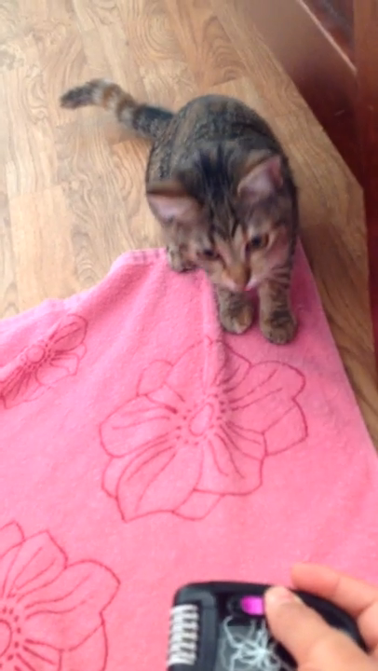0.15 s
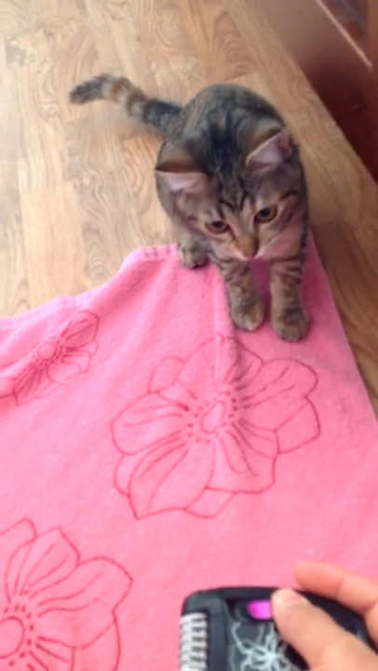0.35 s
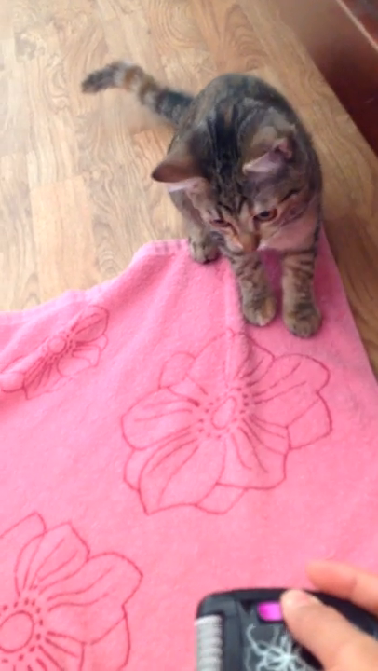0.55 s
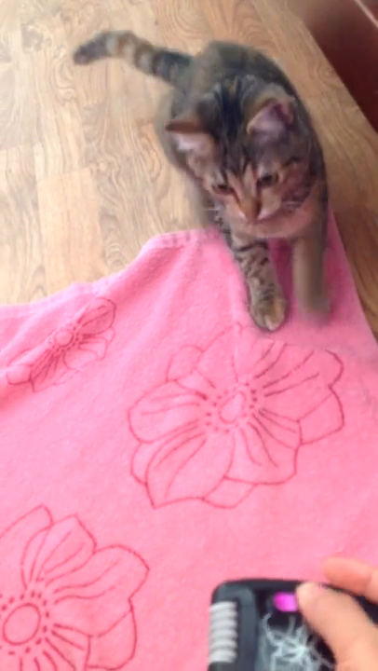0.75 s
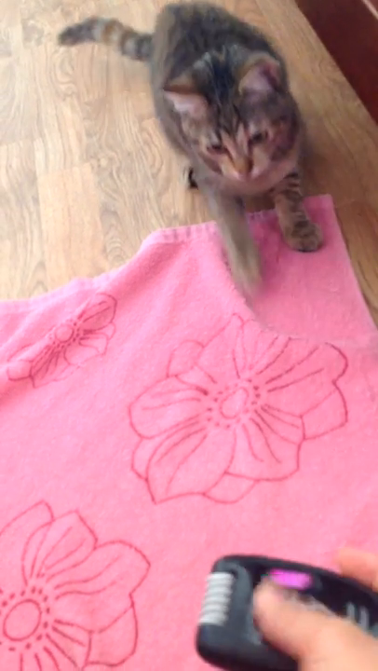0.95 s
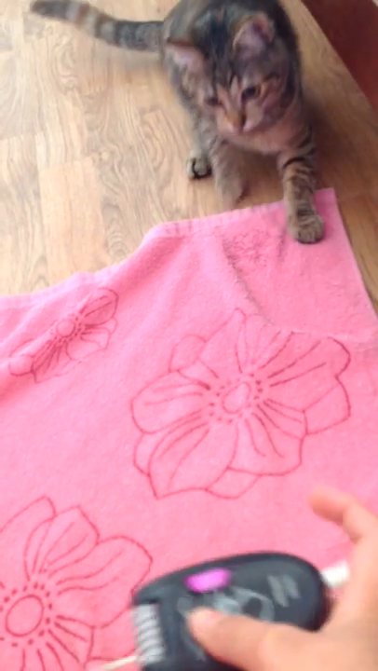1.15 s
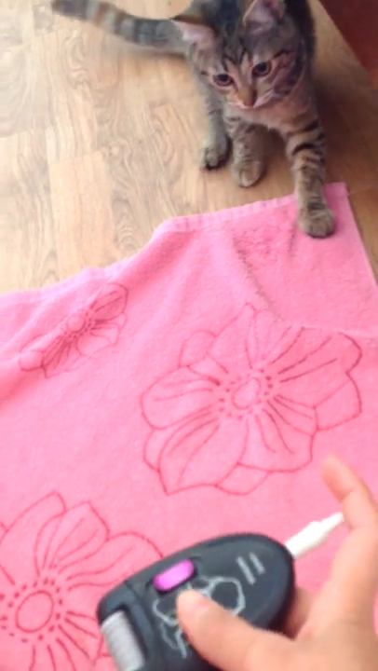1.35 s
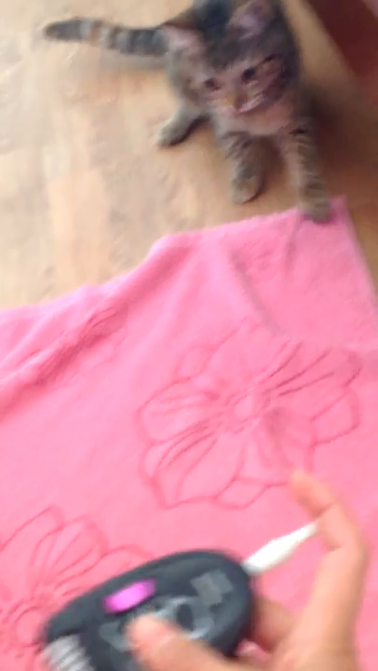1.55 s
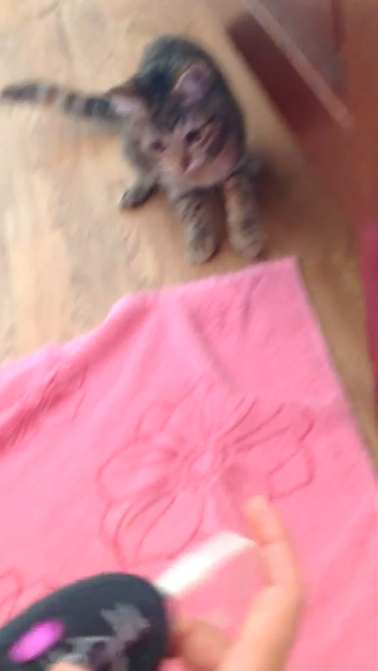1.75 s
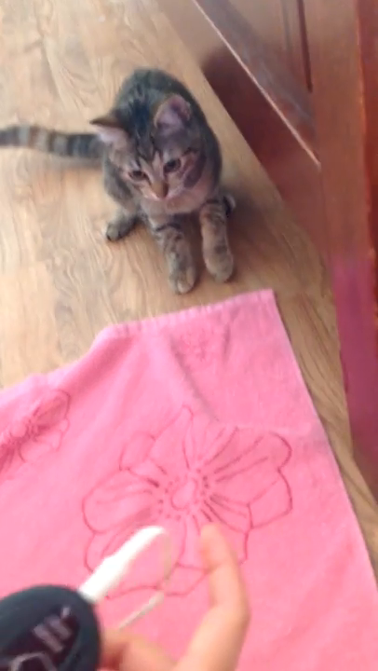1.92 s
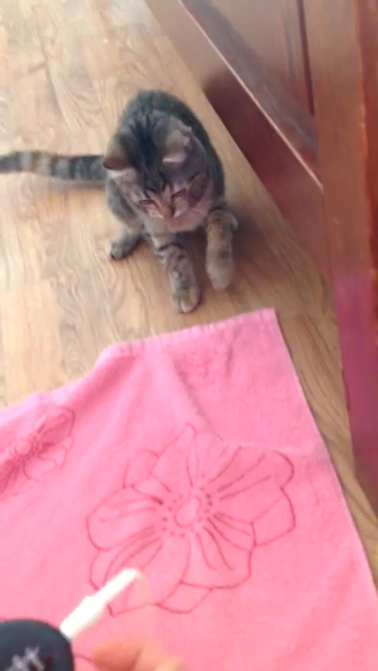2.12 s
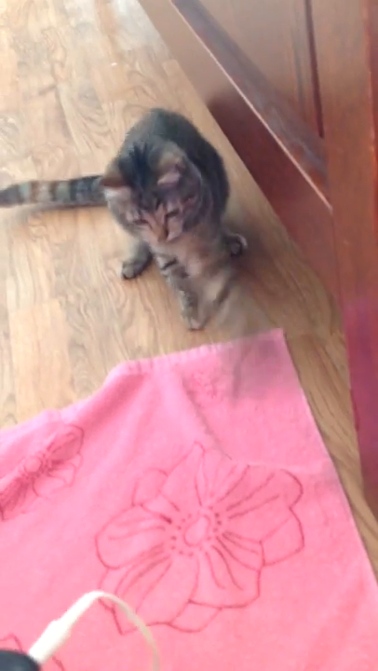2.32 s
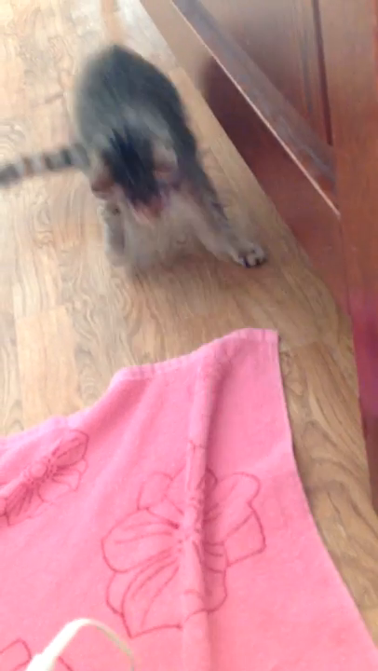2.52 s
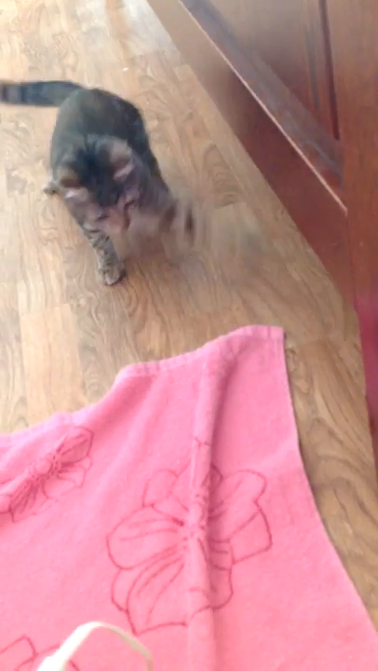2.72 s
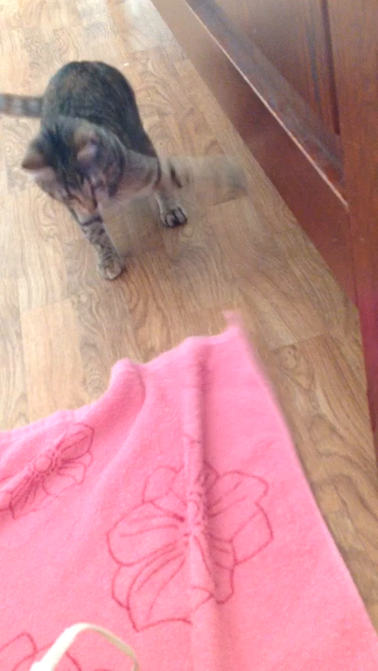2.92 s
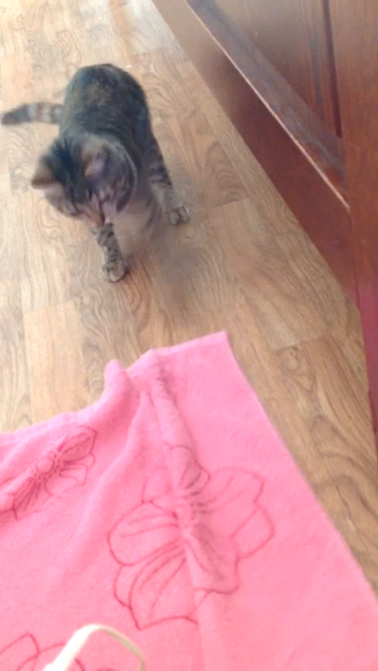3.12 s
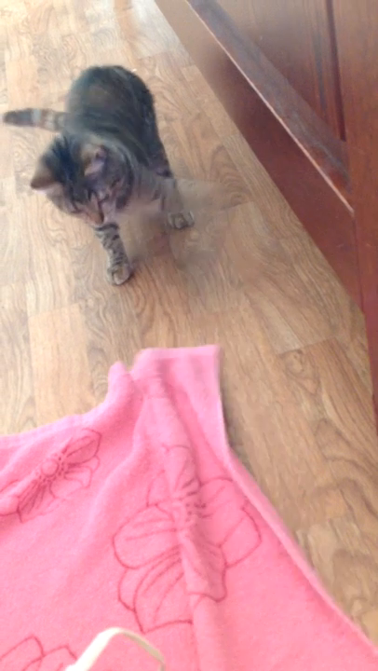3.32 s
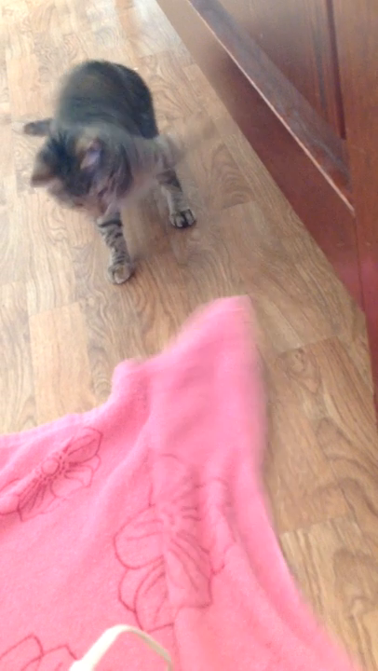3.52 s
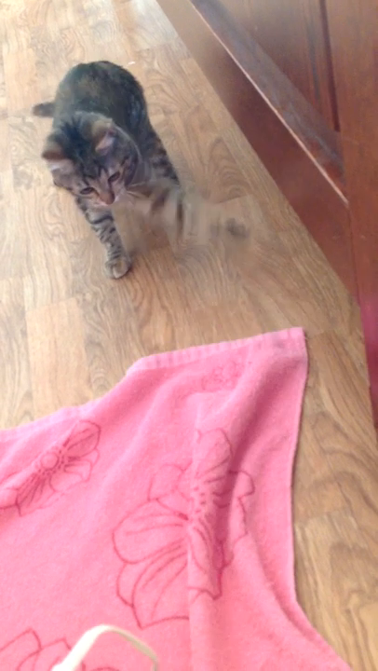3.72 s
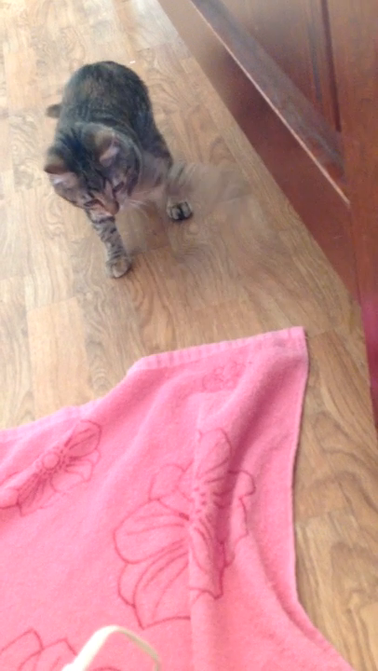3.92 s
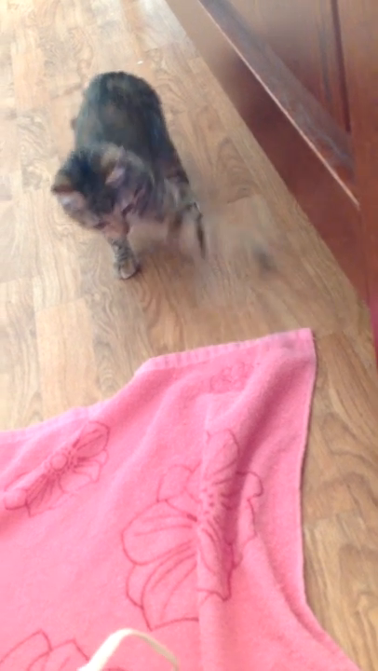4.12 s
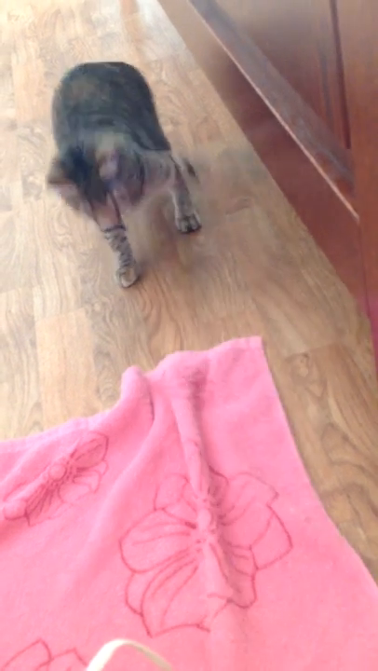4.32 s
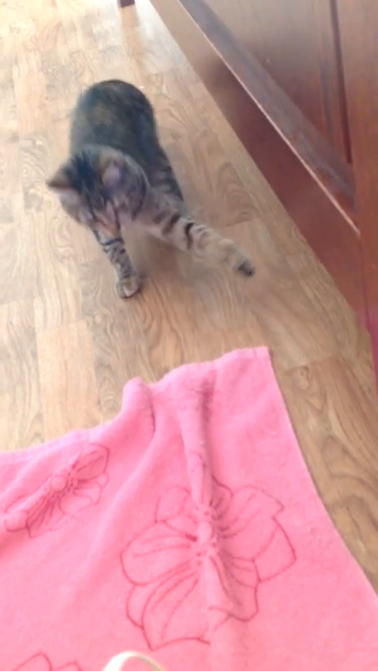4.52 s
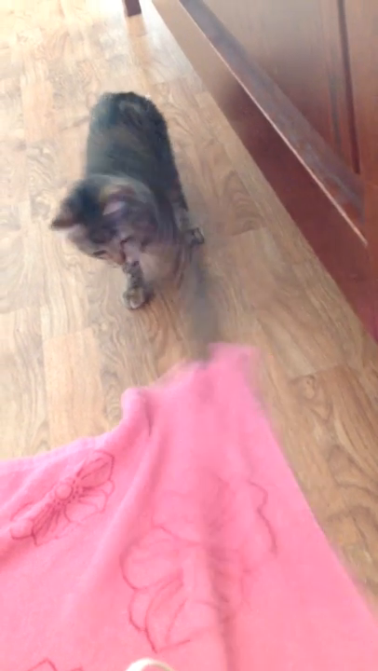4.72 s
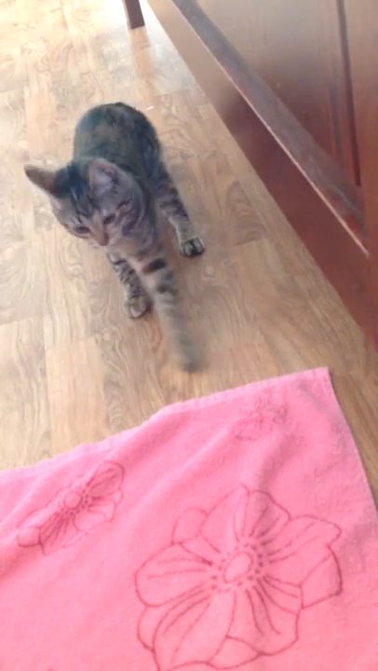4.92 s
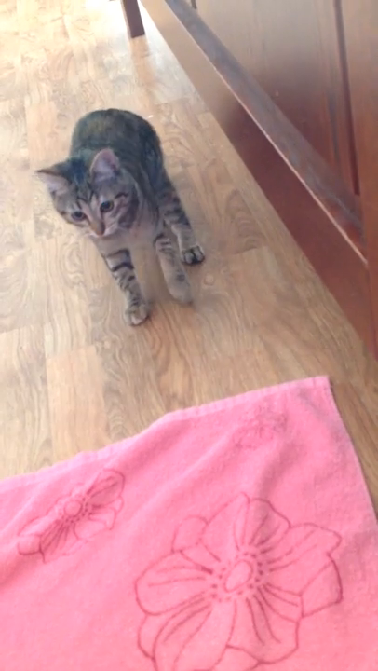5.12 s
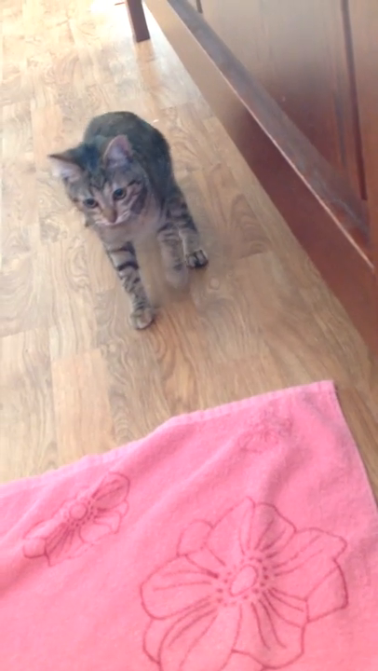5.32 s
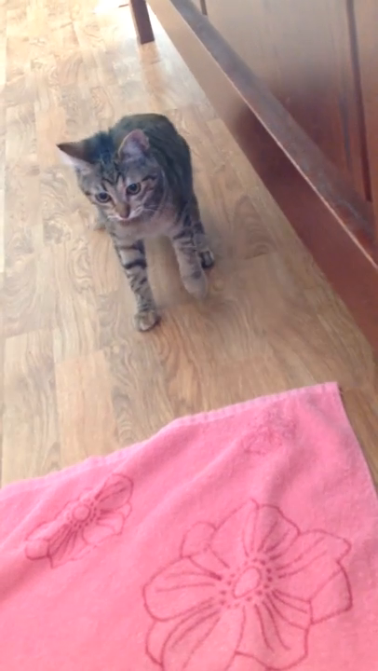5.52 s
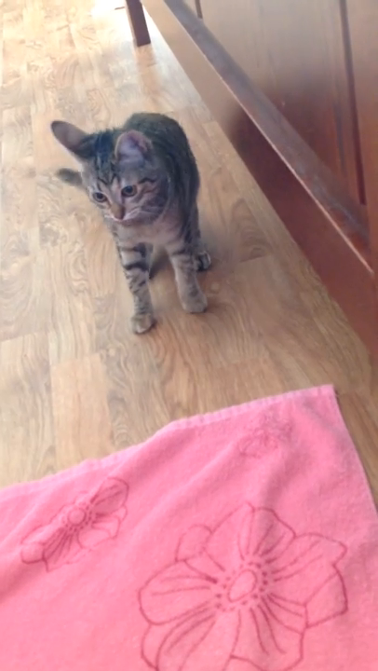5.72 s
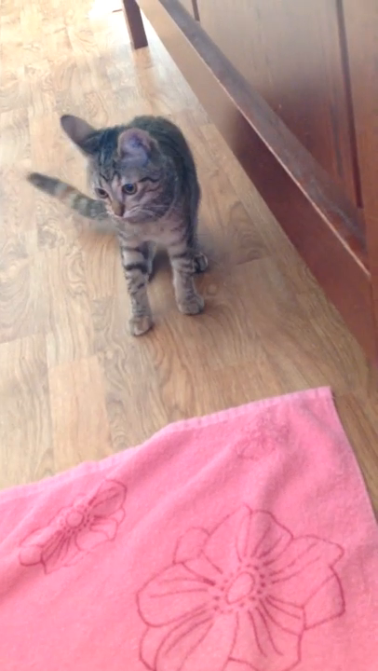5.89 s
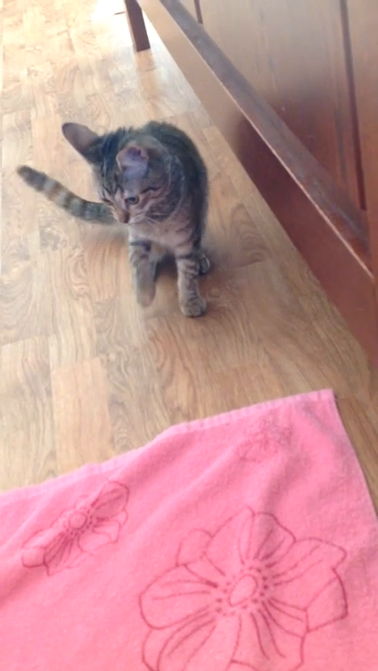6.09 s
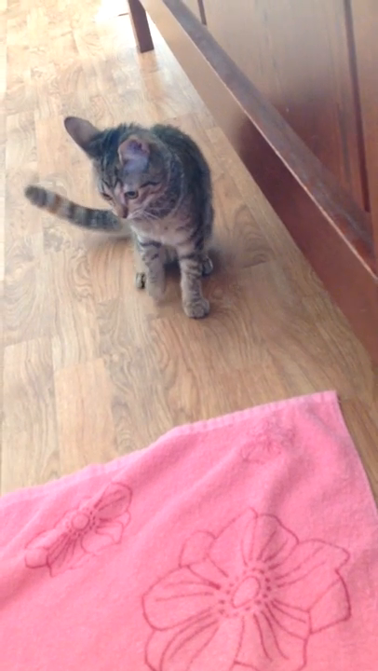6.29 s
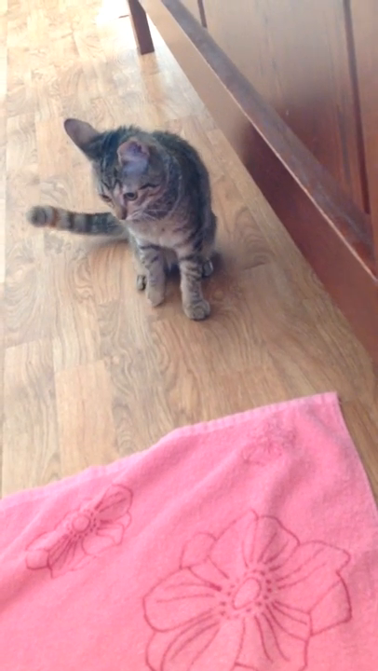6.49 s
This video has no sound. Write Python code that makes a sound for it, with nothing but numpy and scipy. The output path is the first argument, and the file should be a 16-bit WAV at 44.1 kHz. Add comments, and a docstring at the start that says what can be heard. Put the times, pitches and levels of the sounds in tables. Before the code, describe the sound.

Close recording in a small, quiet indoor room. Faint handling ticks come first, then a small motor device switches on and jumps straight to full speed. It buzzes continuously, bright and rough, with rapid metallic chatter and a gritty gear whirr. Its colour changes subtly when turned, lowered and pointed away. Soft low knocks from a kitten pawing at cloth sit underneath, and the buzz never stops.

```python
"""Hand-held epilator in a quiet room

Close to the microphone a small electric epilator is switched on and runs on, held in a hand.
Its drum spins up to about 29 turns a second; four rows of tweezers snap shut and chatter in each turn.
Filtered noise makes the gears grind, tones locked to the drum make them hum, and a rubbing drum whines.
The shell's resonances shift as the hand turns, lowers and averts it; a short room answer follows.
Behind it are ticks of handling, soft bumps as a kitten paws at a towel, and the room's quiet noise."""
import sys
import numpy as np
from scipy import signal
from scipy.fft import rfft, irfft, next_fast_len
from scipy.io import wavfile
from scipy.ndimage import map_coordinates

SR = 44100
rng = np.random.default_rng(int(sys.argv[2]) if len(sys.argv) > 2 else 0)


def to_wav(sig):
    """Store sig (one row per channel, or 1-D mono) as 16-bit WAV at the path in sys.argv[1].

    Samples outside -1..1 are clipped; the rate is SR.
    """
    pcm = np.clip(np.atleast_2d(sig), -1, 1) * 32767
    pcm = np.round(pcm).astype(np.int16)
    wavfile.write(sys.argv[1], SR, pcm.T)  # frames by channels


N = 288855
T = np.arange(N) / SR  # time of every sample [s]

SWITCH_ON_S, SPIN_UP_S = 0.61, 0.029  # start, and time constant of the drum's approach to speed
# drum speed once it is up: (time [s], speed [turns/s])
DRUM_SPEED = [(0.6, 29.88), (0.95, 29.39), (1.2, 29.12), (1.55, 29.65), (1.9, 29.31), (2.3, 29.29),
              (2.85, 29.4), (2.98, 28.21), (3.35, 28.62), (3.7, 28.92), (4.05, 28.92), (4.2, 29.27),
              (4.42, 28.52), (4.72, 29.2), (5.0, 28.63), (5.3, 29.09), (6.1, 29.13), (6.4, 28.63)]
# tweezer rows round the drum: (place in the turn [0-1], relative strength [dB])
TWEEZER_ROWS = [(0.098, -6), (0.337, -6), (0.588, -7), (0.81, -4)]
# spells in which a row knocks harder or softer, one list per row: (middle [s], half length [s], lift [dB])
ROW_SPELLS = [
    [(1.15, 0.13, 2.5), (2.02, 0.14, 4.5), (3.1, 0.089, 0.5), (3.65, 0.28, -1), (4.5, 0.53, 3),
     (5.65, 0.097, 3), (6.3, 0.13, -12)],
    [(0.7, 0.093, 7), (1.45, 0.2, -5.5), (2.15, 0.29, 4), (3.1, 0.08, -2), (3.8, 0.14, 4), (4.7, 0.3, 3)],
    [(0.87, 0.12, -9), (1.55, 0.31, 3), (3.38, 0.076, 4), (4.1, 0.5, 2), (5.0, 0.12, 4.5), (5.5, 0.34, 2.5),
     (6.02, 0.1, 0.5)],
    [(0.72, 0.087, 0.5), (1.18, 0.12, 0.5), (3.0, 0.12, 3), (3.55, 0.3, 2.5), (4.15, 0.19, -1),
     (4.5, 0.12, 0), (5.35, 0.11, 0), (5.85, 0.12, -1.5), (6.3, 0.28, 2)],
]
# single closings given their own force: (time [s], lift [dB])
CRACKING_CLOSINGS = [(0.626, 4), (0.641, -0.5), (1.176, -5), (2.674, 6), (3.475, 2.5), (4.565, 2),
                     (4.988, 2.5), (5.342, 2)]
# relative loudness of the works as the hand moves: (time [s], snapping [dB], grinding [dB])
WORKS_LOUDNESS = [(0.8, -34, -29.5), (1.2, -29, -30.5), (1.6, -31.5, -28), (2.4, -30.5, -29.5),
                  (3.1, -31.5, -27.5), (3.6, -29.5, -30.5), (4.3, -31, -29), (5.4, -29.5, -29.5),
                  (5.92, -30, -29.5), (6.2, -32.5, -28), (6.5, -33, -27.5)]
# colour of the snapping: (frequency [Hz], relative level [dB per Hz])
SNAP_COLOUR = [(30, -69), (100, -40), (250, -26), (420, -20), (600, -10.5), (800, -4), (1200, -1),
               (1700, -3.5), (2600, 0), (3600, -8), (5000, -10), (9000, -16.5), (15000, -21.5)]
# colour of the grinding: (frequency [Hz], relative level [dB per Hz])
GRIND_COLOUR = [(30, -60), (100, -40.5), (300, -23), (450, -13.5), (700, -3.5), (1200, -5), (2500, 1),
                (3600, -0.5), (5000, -1), (7000, -4), (10000, -8), (13000, -12.5), (15500, -19)]
# louder grinding just before the hand sinks: (middle [s], half length [s], lift [dB])
GRIND_STRAIN = (2.88, 0.084, 2)

# hum of drum and gear train, the two broken multiples from a faster shaft; levels before HUM_DB:
# (multiple of drum speed [1], level held up [dB], level once lowered [dB])
GEAR_LINES = [(12, -63.0, -59.5), (16, -56.5, -54.0), (17.31, -50.0, -51.5), (18, -57.0, -62.5),
              (20, -55.5, -62.5), (21.31, -47.0, -48.0), (22, -54.0, -55.0), (23, -59.5, -54.0),
              (24, -46.0, -46.5), (25, -54.0, -48.0), (26, -54.5, -49.5), (27, -53.0, -49.5),
              (28, -47.5, -45.5), (29, -54.0, -48.5), (30, -49.0, -48.0), (31, -48.5, -50.0),
              (32, -45.5, -46.5), (33, -49.5, -51.0), (34, -45.5, -42.5), (35, -48.0, -43.5),
              (36, -46.5, -45.0), (37, -46.0, -42.5), (38, -47.0, -41.5), (39, -48.5, -46.5),
              (40, -43.5, -41.0), (41, -46.0, -42.0), (42, -51.0, -48.5), (43, -50.0, -44.0),
              (44, -49.5, -45.5), (45, -51.5, -46.5), (46, -50.0, -47.5), (48, -50.0, -47.5),
              (50, -48.5, -45.0), (54, -50.5, -50.5), (65, -48.0, -52.0), (69, -47.0, -49.5),
              (71, -49.0, -50.5)]
# hum lines that swell once, keyed by multiple: (middle [s], half length [s], lift [dB])
LINE_SWELLS = {12: (3.52, 0.28, 6), 28: (1.22, 0.24, 10)}
HUM_WAVER_DB, HUM_SLACK = 3.0, 0.011  # wander of level; wander of phase [radians per multiple]
HUM_LAG, HUM_SKEW = 0.012, 0.8  # delay behind the closings [turns]; phase scatter [radians]
HUM_DB, HUM_FLUTTER_DB = -1.53, 1.12  # shift of the line levels; fast flutter of the whole hum
HUM_FOLLOWS = 0.55  # share of the snapping's level swings, in dB, that the hum follows
# brief whines of the drum rubbing in its head: (middle [s], half length [s], pitch [Hz], level [dB])
DRUM_WHINES = [(1.36, 0.13, 4170, -41), (2.68, 0.06, 4590, -35.5), (2.92, 0.11, 4530, -36),
               (3.65, 0.055, 4590, -33.5)]

# main resonance of the shell, sliding with the grip: (time [s], frequency [Hz])
SHELL_WHIRR = [(0.65, 2490), (1.7, 2555), (2.0, 2600), (2.4, 2804), (3.1, 2750), (3.6, 2740), (5.2, 2730),
               (5.9, 2727), (6.25, 2756), (6.55, 2726)]
WHIRR_WIDTH_HZ, WHIRR_DB = 170, 9
# the shell's other resonances, held level: (frequency [Hz], width [Hz], lift [dB])
LEVEL_MODES = [(950, 200, 9), (1980, 260, 8.5), (3290, 190, 9.5), (4460, 420, 7), (6500, 270, 4)]
# held tilted: (frequency [Hz], width [Hz], lift [dB])
TILTED_MODES = [(920, 140, 5.7), (2040, 200, 4.9), (4400, 290, 4.2), (7960, 1300, 5.1)]
# held turned: (frequency [Hz], width [Hz], lift [dB])
TURNED_MODES = [(656.4, 200, 2.5), (1180, 450, 6), (2464, 150, 6), (3400, 360, -4), (4520, 950, 6.5),
                (5400, 760, 2), (7750, 550, 3.5)]
# held low: (frequency [Hz], width [Hz], lift [dB])
LOW_MODES = [(1200, 680, 3.3), (2270, 60, 2), (2315, 85, -2), (2456, 130, 4.5), (2660, 90, 1),
             (3040, 59, 2.5), (3126, 120, 4.5), (3650, 200, -5), (3850, 35, 4), (4330, 920, 6),
             (4860, 560, 2), (6140, 380, 4.5), (7870, 360, 6)]
# pointed away: (frequency [Hz], width [Hz], lift [dB])
AWAY_MODES = [(1100, 360, 0), (2000, 500, 3.5), (2480, 120, 3.5), (2680, 110, -3.5), (2930, 250, 2.5),
              (3700, 210, -3), (4460, 1200, 5), (7840, 480, 5)]
# movements of the hand: (start [s], end [s])
TILTING, TURNING = [0.61, 1.3], [2.2, 2.58]
# the hand lowers the epilator: (start [s], end [s])
LOWERING_SPAN = [2.96, 3.7]
# the hand points it away: (start [s], end [s])
AVERTING_SPAN = [5.99, 6.2]

# faint ticks of handling, the last one the switch: (time [s], level before the noise [dB])
HANDLING_TICKS = [(0.092, -63), (0.219, -57), (0.335, -58), (0.609, -47)]
# soft bumps: (time [s], nominal peak level [dB], pitch [Hz], decay [s])
SOFT_BUMPS = [(1.9412, -28, 268, 0.0026), (2.41, -52, 230, 0.0074), (2.925, -50, 208, 0.006),
              (3.55, -53, 200, 0.0041), (3.854, -53, 267, 0.012), (4.27, -51, 240, 0.0055),
              (4.644, -34.5, 280, 0.0054), (4.802, -46, 253, 0.0068)]
# colour of the room's quiet: (frequency [Hz], relative level [dB per Hz])
ROOM_COLOUR = [(15, -56), (25, -26), (49, -25), (113, -9), (215, -1), (281, 0.5), (305, -2.5), (552, -6),
               (631, -9), (1530, -14), (2420, -14.5), (15500, -20.5)]
ROOM_DB = -62.5  # rms level of the quiet
TOP_HZ = 15450  # band limit of the recorder


def epilator():
    """The motor pulls the drum up to speed exponentially; its turning drives the snaps and the hum."""
    running = 1 - np.exp(-np.maximum(T - SWITCH_ON_S, 0) / SPIN_UP_S)
    lowered = np.interp(T, LOWERING_SPAN, [0, 1])
    turns = np.cumsum(running * curves(DRUM_SPEED)[0]) / SR
    snap_db, grind_db = curves(WORKS_LOUDNESS)

    snapping, shaking = tweezers(turns, scatter_db=1.52, jitter=0.0001, spread=0.0006,
                                 chatter_life=0.004, chatter_db=2.0, clack_db=-0.5, count=4)
    strain = amp(swell(T, *GRIND_STRAIN))
    rubbing = running ** 1.5 * strain * grinding(shaking, load_share=0.026, grain_db=1.0)
    works = amp(snap_db) * running ** 0.14 * snapping + amp(grind_db) * rubbing

    follow_db = HUM_FOLLOWS * (snap_db - np.median(snap_db))
    hum_db = HUM_DB + follow_db + HUM_FLUTTER_DB * wobble(60)
    hum = running ** 14 * amp(hum_db) * gear_hum(turns, lowered)
    heard_works = room(shell(works, lowered), t60=0.2, wet_db=-11, count=10)
    return heard_works + hum + whines(width_hz=30)


def tweezers(turns, scatter_db, jitter, spread, chatter_life, chatter_db, clack_db, count):
    """Rows of count blades snap, chatter and clack; returns the sound and the chatter envelope."""
    place, row_db = np.transpose(TWEEZER_ROWS)
    total = int(turns[-1])
    closing = (np.arange(total)[:, None] + place).ravel()
    times = np.interp(closing, turns, T)
    chance = rng.standard_normal((len(closing), 4))

    row_times = times.reshape(total, -1).T
    spell_db = np.transpose([sum(swell(t, *spell) for spell in spells)
                             for t, spells in zip(row_times, ROW_SPELLS)])
    force_db = (row_db + spell_db).ravel()
    for s, db in CRACKING_CLOSINGS:
        nearest = np.argmin(np.abs(times - s))
        force_db[nearest] += db
        chance[nearest, :3] = 0  # no random force or clack delay here
    sizes = amp(force_db + scatter_db * np.clip(chance[:, 0], -2, 2))

    # every blade seats with its own lag [s], a little different in each turn
    lags = np.tile(spread * rng.standard_normal((len(TWEEZER_ROWS), count)), (total, 1))
    seating = times[:, None] + lags + jitter * rng.standard_normal(lags.shape)
    signs = (-1) ** np.arange(count)
    snaps = unit(impulses(seating.ravel(), (sizes[:, None] * signs).ravel()))

    # the blades touch 1 ms before they seat and rattle on after it
    touches = impulses(times - 0.001, sizes ** 2)
    shaking = unit(np.sqrt(np.abs(fading(touches, chatter_life))))
    chatter_colour = along([(600, -9.5), (1200, -4.5), (2200, 0.0)])
    chatter = coloured(shaking * rng.standard_normal(N), chatter_colour)

    # play in the bearings lets the drum clack against the head, unevenly from closing to closing
    blow_db = force_db + 1.0 * np.clip(chance[:, 2], -2, 1.1)
    blows = amp(blow_db) * np.sign(chance[:, 3])
    clack_colour = along([(600, -22.5), (1600, -7.5), (2600, -1.0), (4000, -8.5)])
    clacks = coloured(unit(impulses(times + 0.0004 * chance[:, 1], blows)), clack_colour)

    mixed = snaps + amp(chatter_db) * chatter + amp(clack_db) * clacks
    return unit(coloured(mixed, along(SNAP_COLOUR))), shaking


def grinding(shaking, load_share, grain_db):
    """Teeth and cams rub as grainy noise, harder while a row is pressed shut."""
    load = 1 + load_share * shaking
    friction = load * amp(grain_db * wobble(900)) * rng.standard_normal(N)
    return unit(coloured(friction, along(GRIND_COLOUR)))


def gear_hum(turns, lowered):
    """Tones locked to the drum, loosely in step with the closings, waver with the play of the teeth."""
    place, row_db = np.transpose(TWEEZER_ROWS)
    hum = np.zeros(N)
    for multiple, up_db, low_db in GEAR_LINES:
        db = up_db + lowered * (low_db - up_db) + HUM_WAVER_DB * wobble(5)
        if multiple in LINE_SWELLS:
            db = db + swell(T, *LINE_SWELLS[multiple])
        row_phases = np.exp(-2j * np.pi * multiple * (place + HUM_LAG))
        in_step = np.angle(np.sum(amp(row_db) * row_phases)) + HUM_SKEW * rng.standard_normal()
        slack = HUM_SLACK * multiple * wobble(12)
        hum += amp(db) * np.cos(2 * np.pi * multiple * turns + in_step + slack)
    return np.sqrt(2) * hum  # line levels are rms


def whines(width_hz):
    """Rubbing noise sets a narrow resonance singing for a moment."""
    out = np.zeros(N)
    for s, half, hz, db in DRUM_WHINES:
        singing = unit(ring(rng.standard_normal(N), hz, width_hz))
        out += amp(db) * np.exp(-((T - s) / half) ** 2) * singing
    return out


def shell(x, lowered):
    """The plastic shell's resonances crossfade as the hand tilts, turns, lowers and averts it."""
    whirr = ring(x, curves(SHELL_WHIRR)[0], WHIRR_WIDTH_HZ)
    x = x + (amp(WHIRR_DB) - 1) * whirr
    heard = coloured(x, lifts(LEVEL_MODES))
    tilted, turned, averted = [np.interp(T, span, [0, 1]) for span in (TILTING, TURNING, AVERTING_SPAN)]
    for modes, share in [(TILTED_MODES, tilted), (TURNED_MODES, turned),
                         (LOW_MODES, lowered), (AWAY_MODES, averted)]:
        heard = (1 - share) * heard + share * coloured(x, lifts(modes))
    return heard


def room(x, t60, wet_db, count):
    """Floor and furniture send back short, dense noise tails, new at each place the hand passes."""
    t, hop = T[:SR // 2], N // count
    fade = np.sin(np.pi * np.arange(2 * hop) / (2 * hop))
    padded, wet = np.pad(x, (hop, 2 * hop)), np.zeros(2 * N)
    for start in range(0, N + hop, hop):
        tail = rng.standard_normal(len(t)) * amp(-60 * t / t60) * (t > 0.003)
        tail /= np.linalg.norm(tail)
        answer = signal.fftconvolve(padded[start:start + 2 * hop] * fade, tail)
        wet[start:start + len(answer)] += answer
    return x + amp(wet_db) * wet[hop:hop + N]


def ticks(life):
    """Handling makes small dry ticks: coloured noise under a sudden, exponentially dying envelope."""
    s, db = np.transpose(HANDLING_TICKS)
    colour = along([(300, -11), (3000, -1.5), (6000, -19), (15000, -25)])
    rasp = unit(coloured(rng.standard_normal(N), colour))
    return fading(impulses(s, amp(db)), life) * rasp


def bumps(rise):
    """Soft contacts: low sines that rise at once and die within a few cycles make dull knocks."""
    out = np.zeros(N)
    for s, db, hz, decay in SOFT_BUMPS:
        t = np.maximum(T - s, 0)
        envelope = (1 - np.exp(-t / rise)) * np.exp(-t / decay)
        out += amp(db + 7) * envelope * np.sin(2 * np.pi * hz * t)  # 7 dB makes up for the envelope
    return coloured(out, along([(30, -43), (70, -26), (130, -2), (280, 1.5), (500, 11.0), (1500, -17)]))


def room_quiet():
    """The quiet room is steady coloured noise."""
    return amp(ROOM_DB) * unit(coloured(rng.standard_normal(N), along(ROOM_COLOUR)))


def amp(db):
    """Decibels to gain."""
    return 10 ** (np.asarray(db) / 20)


def unit(x):
    """Scale to rms 1."""
    return x / np.sqrt(np.mean(x ** 2) + 1e-20)


def curves(rows):
    """One value per sample for each column after the time."""
    s, *cols = np.transpose(rows)
    return [np.interp(T, s, c) for c in cols]


def wobble(rate):
    """A smooth random curve, rate knots a second."""
    knots = rng.standard_normal(int(N * rate / SR) + 4)
    steps = np.arange(0, len(knots) - 1, 1 / 10)
    smooth = map_coordinates(knots, [steps])
    return np.interp(T * rate, steps, smooth)


def swell(t, middle, half, db):
    """A smooth bell of db decibels, or a dip where db is negative."""
    return db * np.exp(-((t - middle) / half) ** 2)


def along(points):
    """Gain against frequency from (frequency [Hz], level [dB]) points on a log axis."""
    f, db = np.transpose(points)
    return lambda hz: amp(np.interp(np.log(hz + 1), np.log(f), db))


def lifts(modes):
    """Gain against frequency of a set of resonances."""
    def gain(hz):
        return amp(sum(db / (1 + (2 * (hz - centre) / width) ** 2) for centre, width, db in modes))
    return gain


def coloured(x, gain):
    """Causal (minimum-phase) filter with the given gain, made by folding its cepstrum."""
    m = 2 * next_fast_len(N // 2 + 4096)
    cepstrum = irfft(np.log(gain(np.fft.rfftfreq(m, 1 / SR)) + 1e-6))
    cepstrum[1:m // 2] *= 2
    cepstrum[m // 2 + 1:] = 0
    response = np.exp(rfft(cepstrum))
    return irfft(rfft(x, m) * response, m)[:N]


def impulses(times, sizes):
    """Single-sample pushes."""
    places = np.clip(np.round(times * SR).astype(int), 0, N)
    return np.bincount(places, sizes, N + 1)[:N]


def fading(x, life):
    """Each push dies away exponentially with time constant life [s]."""
    return signal.lfilter([1], [1, -np.exp(-1 / (life * SR))], x)


def ring(x, hz, width_hz):
    """A resonance of gain 1 whose pitch may slide: shift to zero, smooth, shift back."""
    carrier = np.exp(2j * np.pi * np.cumsum(hz * np.ones(N)) / SR)
    life = 1 / (np.pi * width_hz)
    return 2 * np.real(carrier * fading(x / carrier, life)) / (life * SR)


def scene():
    """The epilator and small contacts over the room's quiet."""
    return (epilator() + ticks(life=0.0069) + bumps(rise=0.00072) + room_quiet())[None]


def record(dry):
    """The recorder keeps nothing above its band limit."""
    m = next_fast_len(N + SR // 2)
    kept = np.fft.rfftfreq(m, 1 / SR) < TOP_HZ
    return irfft(rfft(dry, m) * kept, m)[..., :N]


dry = scene()
out = record(dry)
to_wav(out)
```